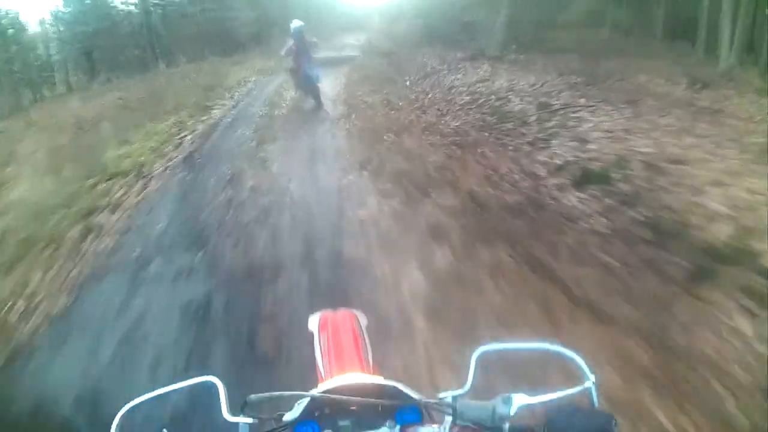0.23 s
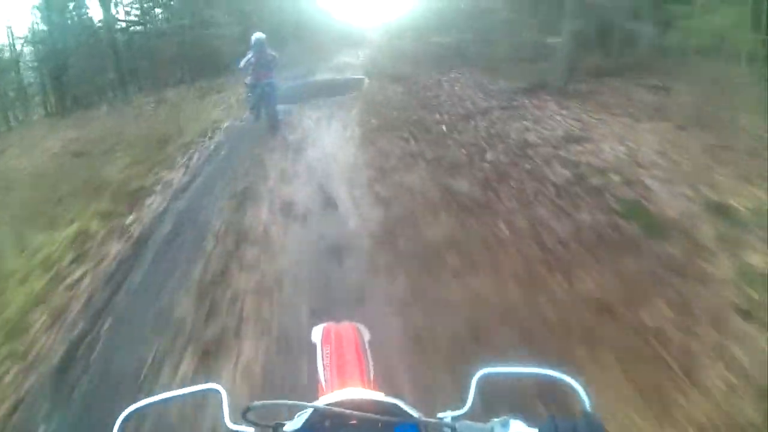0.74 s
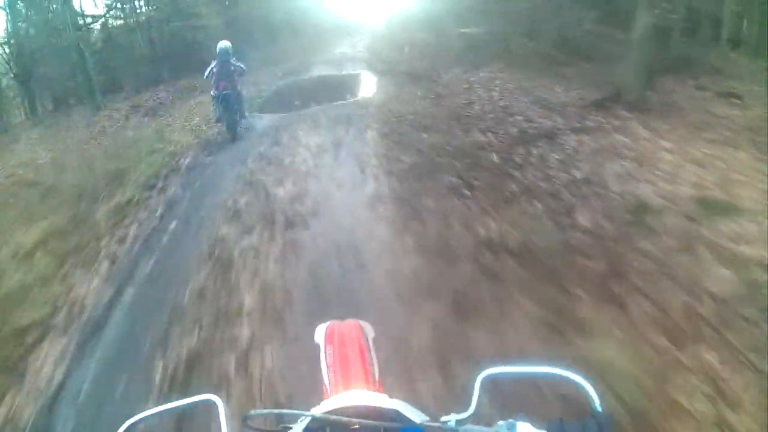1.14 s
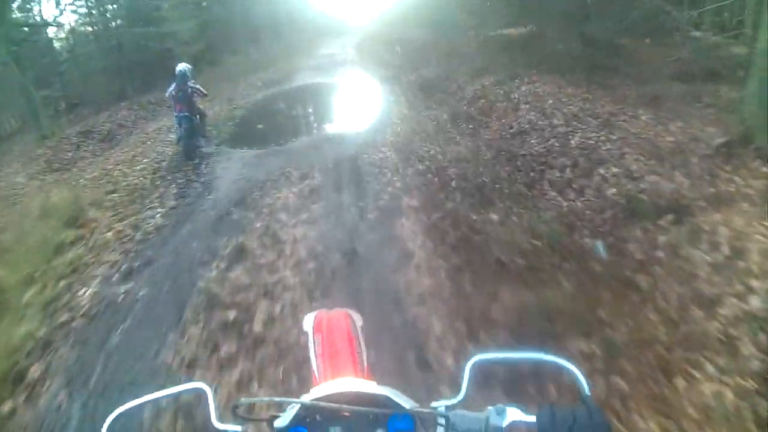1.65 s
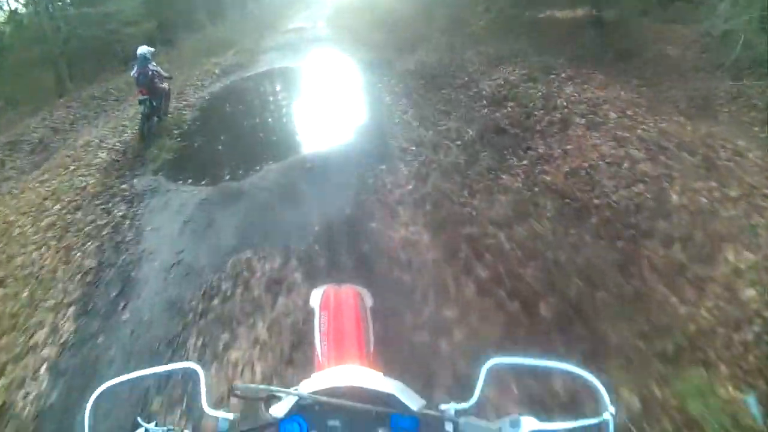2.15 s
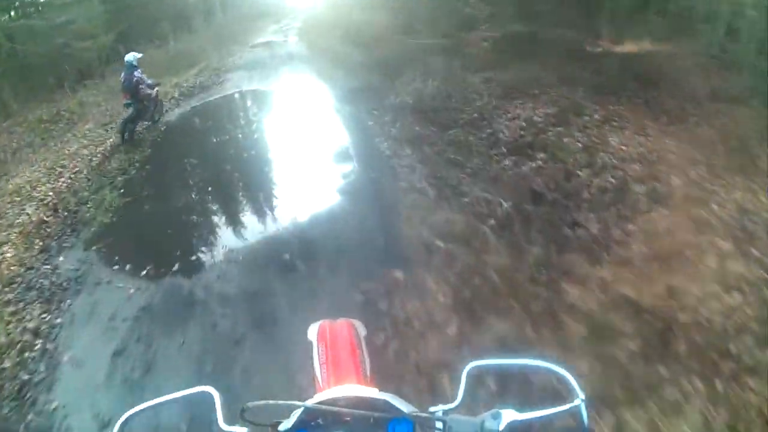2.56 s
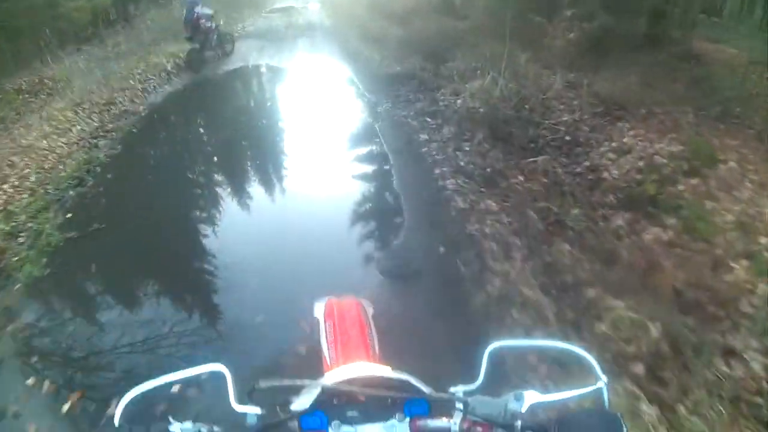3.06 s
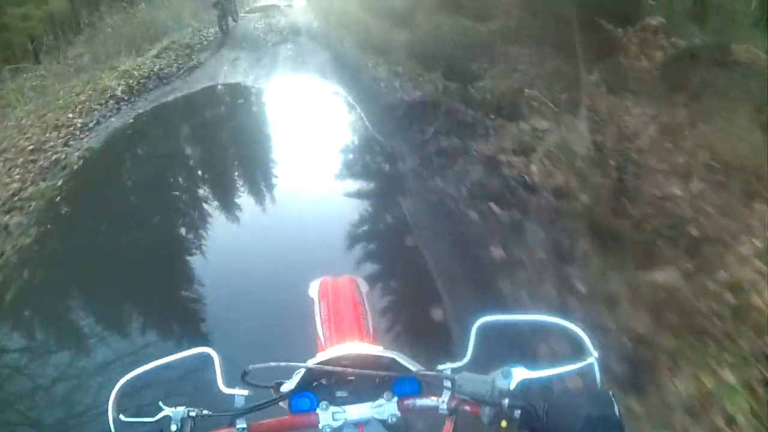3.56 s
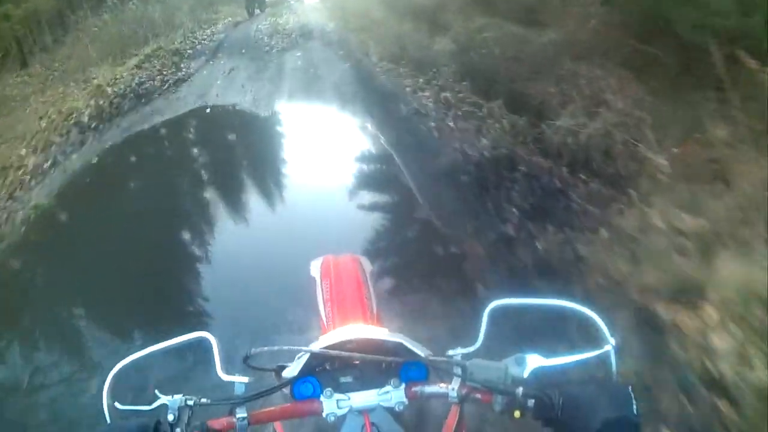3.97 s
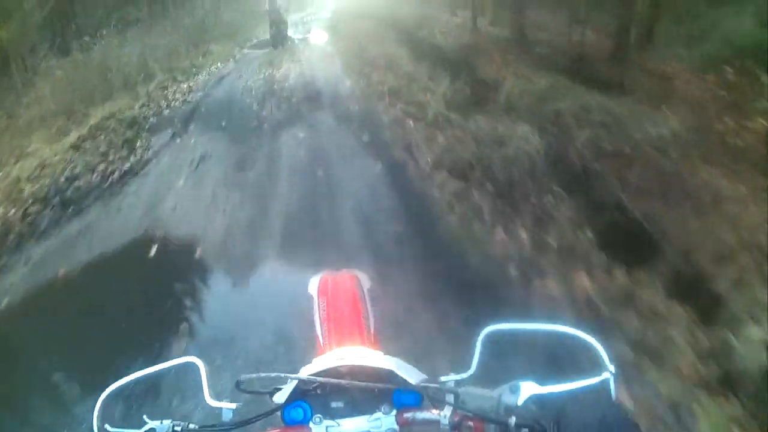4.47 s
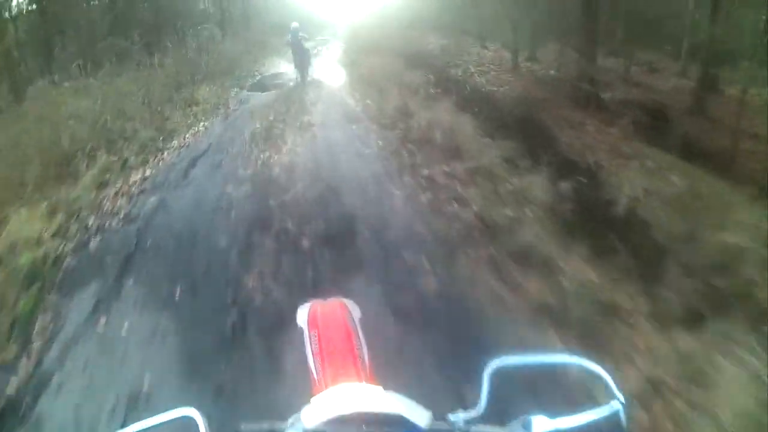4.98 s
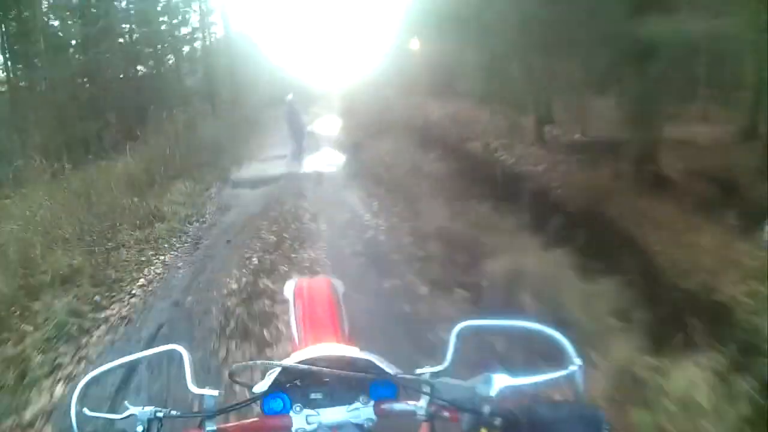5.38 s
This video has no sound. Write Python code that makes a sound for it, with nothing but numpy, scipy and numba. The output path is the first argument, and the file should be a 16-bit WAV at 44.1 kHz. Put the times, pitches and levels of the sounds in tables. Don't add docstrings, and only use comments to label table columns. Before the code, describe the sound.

Muffled wind gusts and knocks buffet a microphone on a dirt bike while an engine cracks in short bursts, then the rider's own engine pulls away.

```python
import sys
import numpy as np
from scipy import signal
from scipy.fft import rfft, irfft
from scipy.io import wavfile
from scipy.ndimage import uniform_filter1d, map_coordinates
from numba import njit

SR = 44100
rng = np.random.default_rng(int(sys.argv[2]) if len(sys.argv) > 2 else 0)


def ratio_of_db(decibels):
    return 10 ** (np.asarray(decibels, float) / 20)


def file_out(sig):
    cols = np.atleast_2d(sig).T
    lim = np.clip(cols, -1, 1)
    pcm = np.round(lim * 32767).astype(np.int16)
    wavfile.write(sys.argv[1], SR, pcm)


N = 248283
T = np.arange(N) / SR
PULL_START_S = 3.52
CEILING = 0.33
SHUT_AFTER_S = 0.06
CUT = signal.ellip(6, 0.5, 60, 4650, fs=SR, output="sos")


def level(x, db):
    return x * ratio_of_db(db) / np.sqrt(np.mean(x ** 2))


def noise():
    return rng.standard_normal(N)


def along(points):
    return np.interp(T, *np.transpose(points))


def walk(rate):
    k = int(SR / rate)
    held = np.repeat(rng.standard_normal(N // k + 1), k)
    return 1.2 * uniform_filter1d(uniform_filter1d(held, k), k)[:N]


@njit
def svf(x, hz, width):
    y, b, l = np.empty(len(x)), 0., 0.
    for i in range(len(x)):
        g, k = np.tan(np.pi * hz[i] / SR), width / hz[i]
        v = (b + g * (x[i] - l)) / (1 + g * (g + k))
        b, l, y[i] = 2 * v - b, l + 2 * g * v, k * v
    return y


def band(x, hz, width):
    return svf(x, np.full(N, float(hz)), float(width))


def ring(x, modes, wander=0.):
    out = np.zeros(N)
    for hz, width, db in modes:
        centre, width = hz * (1 + wander * walk(30)), float(width)
        out += ratio_of_db(db) * svf(svf(x, centre, width), centre, width) / width
    return out


def rung(hits, modes, wander, size):
    push = np.hanning(size)
    unit = np.abs(ring(np.convolve(strikes([0.1], 0), push, "same"), modes)).max()
    return ring(np.convolve(hits, push, "same"), modes, wander) / unit


def colour(x, points, lo=0, hi=SR):
    f = np.arange(N // 2 + 1) * SR / N + 1
    hz, db = np.transpose(points)
    edges = 1 / (1 + (lo / f) ** 8) / (1 + (f / hi) ** 8)
    gain = ratio_of_db(np.interp(np.log(f), np.log(hz), db)) * np.sqrt(edges)
    return irfft(rfft(x) * gain, N)


def strikes(times, db):
    out = np.zeros(N)
    np.add.at(out, np.clip((np.asarray(times) * SR).astype(int), 0, N - 1), ratio_of_db(db))
    return out


def tail(hits, t60):
    return signal.lfilter([1], [1, -np.exp(-np.log(1000) / (t60 * SR))], np.abs(hits))


# start_s, level_db
BREEZE = [
    (0, -32),
    (1.0, -32.5),
    (2.1, -39),
    (2.7, -35),
    (3.0, -34),
    (3.3, -31.5),
    (3.9, -29),
    (4.4, -26),
    (4.85, -23.5),
    (5.63, -23.5),
]
# start_s, length_s, level_db, swell_db (rise over the event)
GUSTS = [(-.02, 0.1, -28, 0), (.165, .24, -21.5, 1.5), (0.426, 0.086, -20.5, -11), (0.573, 0.17, -22.5, 7),
         (0.81, 0.093, -25, -8), (0.935, 0.023, -22.5, 1.5), (1.002, 0.042, -26, -4),
         (1.054, 0.021, -36, -6), (1.197, .085, -31.5, -11.5), (1.3, 0.16, -26.5, -2.5),
         (1.505, 0.14, -29.5, 2.5), (1.672, 0.17, -32.5, -7.5), (1.863, 0.075, -36, 4),
         (1.958, .05, -31, -9.5), (2.223, 0.36, -36.5, -6), (2.898, 0.078, -40, -7),
         (2.933, 0.0067, -28, 1)]


def airstream():
    attack_s, release_s = 0.014, 0.03
    power = ratio_of_db(along(BREEZE)) ** 2
    for start, length, db, swell_db in GUSTS:
        age = T - start
        shape = np.clip(age / attack_s, 0, 1) * np.exp(-np.clip(age - length, 0, None) / release_s)
        swell = swell_db * (np.clip(age / length, 0, 1) - 0.5)
        power = power + (shape * ratio_of_db(db + swell)) ** 2
    return 10 * np.log10(power)


# frequency_hz, level_db (per Hz)
RUSH = [(15, -99), (25, -57), (64, -38.5), (92, -31), (216, -17.5), (263, -12.5), (286, -13.5), (326, -6.5),
        (364, -7), (406, -9.5), (833, -4), (1340, -8), (1820, -23), (2170, -27.5), (4550, -52),
        (5920, -100), (10000, -120)]


def wind():
    eddy_db, flicker_db = 1.1, 1.5
    rush_db = airstream()
    rumble_db = -41.5 + 0.5 * (rush_db + 30)
    chain_db = 13 * np.clip((T - PULL_START_S) / 0.14, 0, 1)
    hiss_db = -60 + 0.85 * (rush_db + 29.5) + chain_db
    out = level(colour(noise() * ratio_of_db(0.58 * walk(8.5)), RUSH, 0, 170), -49)
    out = out + level(band(noise() * ratio_of_db(1.5 * walk(40)), 2950, 1200), -68)
    gust = walk(45)
    regions = [(rush_db, 430, 1900, 1.0), (rumble_db, 170, 430, 0.6), (hiss_db, 1900, SR, 0.8)]
    for db, lo, hi, share in regions:
        eddies = noise() * ratio_of_db(eddy_db * share * gust + flicker_db * walk(70))
        out = out + level(colour(eddies, RUSH, lo, hi), 0) * ratio_of_db(db)
    return out


# start_s, peak_db
KNOCKS = [
    (0.448, -14),
    (0.9629, -8),
    (1.491, -16),
    (1.714, -24.5),
    (3.015, -19),
]


def knocks():
    times, db = np.transpose(KNOCKS)
    return strikes(times, db - 3)


# first_s, last_s (firings), firings, speed_up_share, peak_db
PULLS = [(.0169, 0.0852, 4, 0.055, -9.5), (0.1066, 0.096, 1, 0, -18), (0.994, 1.0222, 2, 0, -9.5),
         (1.3845, 1.4357, 3, .01, -9.5), (1.579, 1.662, 4, .05, -10), (1.7425, 1.8457, 5, 0.045, -9),
         (2.075, 2.108, 2, 0, -24.5), (2.1372, 2.2195, 4, 0.063, -9), (2.2455, 2.3264, 4, -.02, -12),
         (2.3533, 2.4746, 6, .08, -9), (2.4971, 2.6137, 6, -.02, -8.5), (3.032, 3.061, 2, 0, -15),
         (3.0886, 3.1586, 4, .06, -8.5), (3.1815, 3.3385, 8, .003, -9), (3.3597, 3.4347, 4, -.01, -6.5),
         (3.458, 3.572, 6, .03, -8.8), (3.591, 3.669, 5.1, 0, -9.5)]


def bike_ahead():
    shut_db = -23.5
    lag_share = 0.36
    times, db, last_s, last_db = [], [], 0, PULLS[0][4]
    for first, last, firings, faster, peak_db in PULLS:
        k = np.arange(round(firings))
        u = np.linspace(0, 1, len(k))
        old_db = shut_db if first - last_s > SHUT_AFTER_S else last_db
        times = np.r_[times, first + (last - first) * (u + faster * u * (1 - u))]
        db = np.r_[db, peak_db + (old_db - peak_db) * lag_share ** (k + 1)]
        last_s, last_db = last, peak_db
    firing_hz = uniform_filter1d(np.clip(1 / np.diff(times), 34., 60.), size=3)
    puff_db = -13 + 0.35 * (np.interp(T, times[:-1], firing_hz) - 42)
    opened = np.maximum.accumulate(np.where(np.diff(times, prepend=-1) > SHUT_AFTER_S, times, 0))
    puff_db = puff_db + 9 * np.interp(T, times, times - opened)
    jitter_s, scatter_db = 0.0001 * rng.standard_normal(len(times)), 0.2 * rng.standard_normal(len(times))
    return strikes(times - 0.0012 + jitter_s, db + scatter_db), puff_db


# start_s, firing_hz
SPEED = [
    (3.5, 28.11),
    (3.976, 33.83),
    (4.066, 33.6),
    (4.328, 37.2),
    (4.4, 35.73),
    (4.934, 40.31),
    (5.132, 49.78),
    (5.276, 45.85),
    (5.63, 57.41),
]


def crank():
    flywheel_s = 0.06
    hz = uniform_filter1d(along(SPEED), size=int(flywheel_s * SR))
    return np.cumsum(hz * (T >= SPEED[0][0])) / SR


# firing_rate_multiple, level_db (at load 0), wheelspin_change_db
GEAR_TONES = [(11, -48.5, -5), (12, -43, -5.5), (13, -45.5, 0.5), (15, -46.5, 1), (16, -44, 0.5),
              (20, -47.5, -0.5), (23, -53, 16)]


def gears(turns, load, spin):
    out = np.zeros(N)
    for multiple, db, spin_db in GEAR_TONES:
        tone = np.sin(2 * np.pi * (round(multiple) * turns + 0.16 * walk(30)))
        out += ratio_of_db(db + spin_db * spin + 2.37 * load + walk(7)) * tone
    return out


def clatter(turns):
    renew, size = 0.11, 256
    pattern = rng.standard_normal((int(turns[-1] * renew) + 3, size))
    locked = map_coordinates(pattern, [turns * renew, turns % 1 * (size - 1)], order=1)
    locked = signal.sosfilt(signal.butter(4, 2200., fs=SR, output="sos"), locked)
    return locked * ratio_of_db(3.3 * np.cos(2 * np.pi * (turns - 0.5)))


# start_s, load_db
LOAD = [
    (3.52, -14),
    (3.7, -5.5),
    (3.85, -5.5),
    (4.6, 0.5),
    (4.87, -0.5),
    (4.95, 6),
    (5.1, 6.5),
    (5.4, 8),
    (5.63, 8),
]
# centre_hz, width_hz, level_db
THUMP_MODES = [(73, 45, -26.5), (258.5, 34, -11), (301.6, 138, 10.5)]
# centre_hz, width_hz, level_db
EXHAUST_MODES = [(547, 210, 0)]
# centre_hz, width_hz, level_db
CLATTER_MODES = [(555, 234, -2.5), (682, 179, -1), (806, 200, -8.5), (1086, 241, 3), (1333, 220, -8)]


def own_engine():
    load = along(LOAD)
    spin_s, spin_end_s = 4.87, 5.36
    spin = np.clip(np.minimum((T - spin_s) / 0.14, (spin_end_s - T) / 0.035), 0, 1)
    turns = crank()
    cycle = np.arange(int(turns[-1]) + 1)
    chance = rng.standard_normal((6, len(cycle)))

    def at(phase, db):
        return strikes(np.interp(cycle + phase, turns, T), db)

    intake = at(0.1467, 0.45 * chance[0])
    exhaust = at(0.4792 + 0.0025 * chance[1], -1.5 + 0.45 * chance[2])
    thumps = level(ring(intake + exhaust, THUMP_MODES), 0.86) + level(ring(exhaust, EXHAUST_MODES), -6.5)
    thumps = thumps - 0.97 * band(thumps, 140, 90)
    boom = thumps * ratio_of_db(-32.5 + 0.49 * load)
    body = level(ring(clatter(turns), CLATTER_MODES), 0.88) * ratio_of_db(-36 + 1.4 * load)
    opening = np.clip((T - PULL_START_S) / 0.08, 0, 1)
    motor = (boom + body + gears(turns, load, spin)) * opening

    bangs = at(0.33, 1.5 * chance[3]) + at(0.63, -2 + 1.5 * chance[1])
    bangs = bangs * ratio_of_db(-28.5 + 0.2 * load - 60 * (T < 3.7))
    bark = spin * at(0.43 + 0.033 * chance[4], -11.5 + 1.4 * chance[5])
    return motor, bangs + bark


# centre_hz, width_hz, level_db
CRACK_MODES = [(297, 154, -14), (648, 324, -7), (950, 677, 7.5), (1692, 190, -10)]
# centre_hz, width_hz, level_db
EDGE_MODES = [(2040, 260, -5.5), (3320, 1000, 3.5), (3640, 150, -18.5)]
# centre_hz, width_hz, level_db
AFTER_MODES = [(967, 240, -1), (1154, 230, -6)]


def cracks(hits, puff_db):
    late = np.roll(hits, int(0.001 * SR))
    steep = late * np.sqrt(late / CEILING) * ratio_of_db(1.7 * walk(45))
    gas = ratio_of_db(puff_db)
    edge = ratio_of_db(-23.5) * rung(steep, EDGE_MODES, wander=0.1, size=16)
    front = edge - rung(hits, CRACK_MODES, wander=0.067, size=34)
    after = -ratio_of_db(1.5) * gas * rung(hits, AFTER_MODES, wander=0.025, size=34)
    grit = level(colour(noise(), RUSH, lo=300), 0)
    puff = ratio_of_db(-12.5) * gas * tail(late, 0.05)
    scatter = ratio_of_db(-28.5) * tail(late, 0.12)
    return front + after + grit * (puff + scatter)


NOTCH_HZ = (5000, 5500, 7000)


def treble(hits, rush):
    spray = ratio_of_db(-46) * tail(hits, 0.023)
    trace = ratio_of_db(-52) * uniform_filter1d(np.abs(rush), size=200)
    x = noise() * (spray + trace + ratio_of_db(-92))
    x = colour(x, [(4700, -24), (5200, -4.5), (6200, -6), (9500, -4.5), (11800, -8.5), (12900, -26)])
    whine = band(noise(), 9750, 500) * ratio_of_db(3 * walk(30))
    x = x + ratio_of_db(-74.5) * whine * (T > 3.68) * (T < 4.9)
    for hz in NOTCH_HZ:
        x = signal.lfilter(*signal.iirnotch(hz, 6, SR), x)
    return x


def scene():
    motor, bangs = own_engine()
    ahead, ahead_puff_db = bike_ahead()
    own_puff_db = -10 + 0.36 * (along(SPEED) - 42)
    puff_db = np.where(T < PULLS[-1][1] + SHUT_AFTER_S, ahead_puff_db, own_puff_db)
    hits = ahead + bangs + knocks()
    throb_db = 1.8 * np.cos(2 * np.pi * (crank() - 0.5)) * (T > PULL_START_S)
    rush = wind() * ratio_of_db(throb_db) + motor
    case = signal.butter(2, 3600., fs=SR, output="sos")
    dulled = signal.sosfilt(case, cracks(hits, puff_db) + rush)
    filtered = signal.sosfilt(CUT, signal.sosfilt(CUT, dulled))
    return (filtered + treble(hits, rush))[None]


def roll_off(x):
    return signal.sosfilt(signal.butter(12, 13300, fs=SR, output="sos"), x)


def record(dry):
    overtones = dry / (1 + np.abs(dry / CEILING) ** 4) ** 0.25 - dry
    overtones = signal.sosfiltfilt(signal.butter(3, 3000., fs=SR, output="sos"), overtones)
    heard = dry + signal.sosfiltfilt(CUT, overtones)
    heard = signal.sosfilt(signal.butter(3, 60., "high", fs=SR, output="sos"), heard)
    return roll_off(heard)


dry = scene()
out = record(dry)
file_out(out)
```